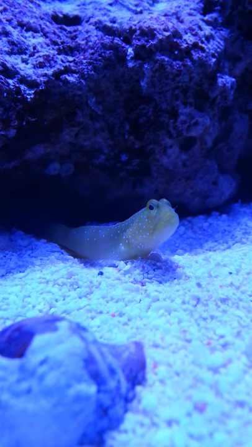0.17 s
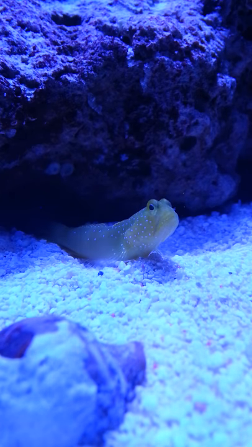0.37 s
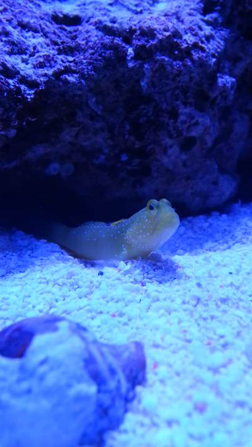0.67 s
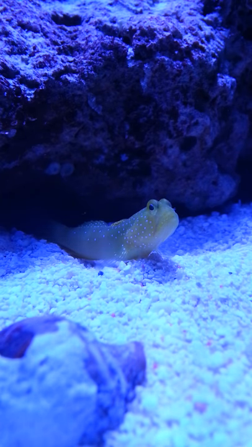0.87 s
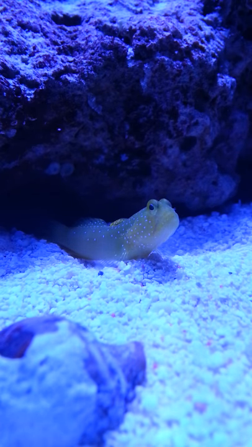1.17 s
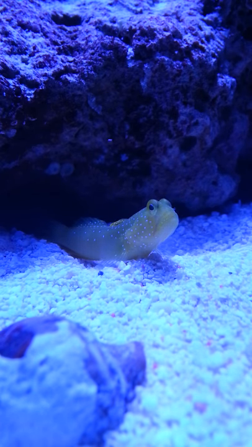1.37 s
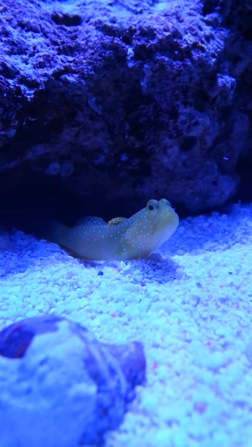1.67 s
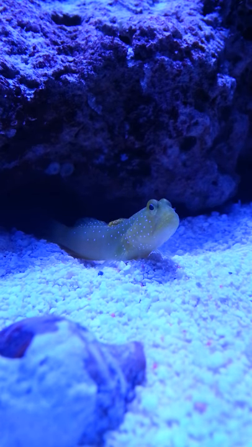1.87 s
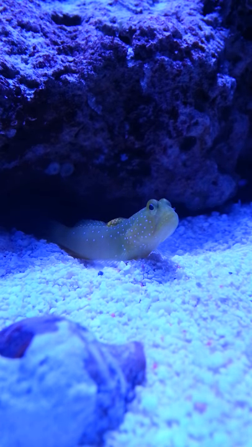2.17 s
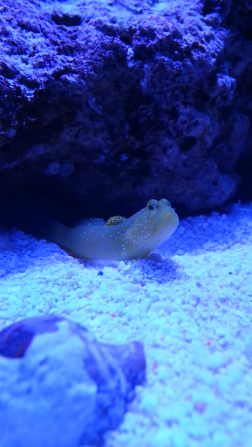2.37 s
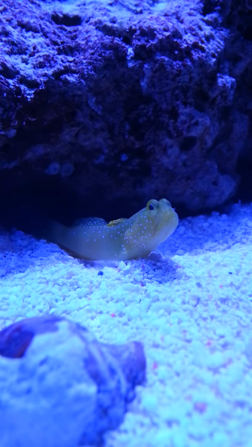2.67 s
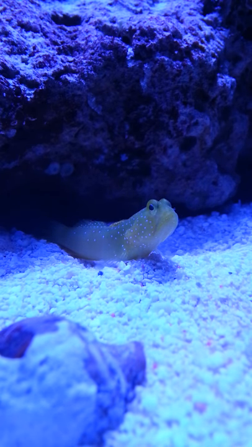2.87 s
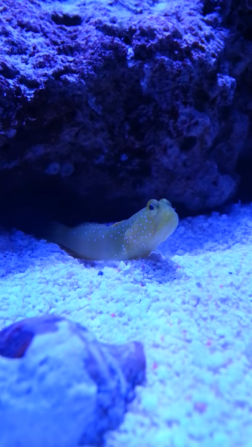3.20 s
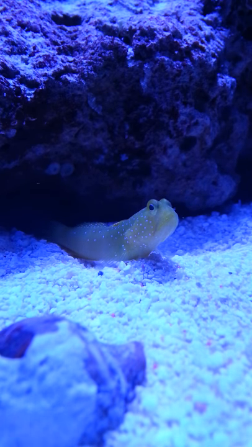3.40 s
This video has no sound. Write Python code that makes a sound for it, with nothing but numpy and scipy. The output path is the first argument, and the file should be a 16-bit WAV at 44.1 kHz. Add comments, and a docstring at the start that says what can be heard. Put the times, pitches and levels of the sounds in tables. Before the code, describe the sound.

Steady low hum of a fish tank pump, with water rumbling and lightly trickling.

```python
"""A home aquarium up close

The mains-powered pump hums through the tank and cabinet, water rumbles in the pipes, and the
drain murmurs and gulps air. The overflow trickles: a fizz of tiny bursting bubbles with louder
drips, all scattered by the room. A very faint electronic whine sits on the right."""
import sys
import numpy as np
from scipy import signal
from scipy.fft import rfft, irfft, next_fast_len
from scipy.io import wavfile
from scipy.ndimage import uniform_filter1d, map_coordinates

SR = 44100
rng = np.random.default_rng(int(sys.argv[2]) if len(sys.argv) > 2 else 0)


def bounce(signal):
    """Save signal as a 16-bit WAV file at the path given by the first command-line argument."""
    frames = np.transpose(np.atleast_2d(signal))
    limited = np.clip(frames, -1, 1)
    pcm = np.round(limited * 32767).astype(np.int16)
    wavfile.write(sys.argv[1], SR, pcm)


N = 156114

# tones of the pump's hum
# (multiple of the mains [x], level [dB], left minus right [dB], left lead [rad], waver [dB])
HUM_TONES = [(2, -38.5, 3.5, 0.15, 0.5), (3, -46, 0.5, 0.19, 1.53), (4, -52, -0.5, 0.99, 1.8),
             (5, -62.5, 2, .61, 3), (6, -60.5, 7.5, 0.023, 3.5), (7, -64.5, -3, 0.83, 2.5),
             (10, -76, -11, 0.1, 4.5), (15, -76.5, -5, 0.1, 3.5)]
# notes of the tank and cabinet (pitch [Hz], half-width [Hz], level [dB], left minus right [dB])
CABINET_NOTES = [(158.5, 9.9, -58.5, -3), (356.8, 11, -59, 3), (461, 12, -69.5, 13.5), (524.4, 6, -59, 2),
                 (1037, 6.4, -74.5, 14), (1268, 8.3, -74.5, 11)]
# tone colour of the rumble (frequency [Hz], left [dB per Hz], right [dB per Hz]), before RUMBLE_DB
RUMBLE_COLOUR = [(25, -103, -99), (45, -89, -89), (70.4, -79, -85), (94, -81.5, -80), (120, -73.5, -71),
                 (161, -63.5, -68.5), (188, -68.5, -76.5), (260, -80.5, -84.5), (346, -75, -73.5),
                 (480, -82.5, -87.5), (550, -74, -80.5), (680, -77.5, -72.5), (793, -72, -79.5),
                 (840, -77.5, -81.5), (877, -83.5, -84), (1220, -86, -90), (1410, -77.5, -81.5),
                 (1475, -95, -90), (1850, -82, -87.5)]
# how alike the rumble is in the two ears (frequency [Hz], likeness [0 to 1])
RUMBLE_LIKENESS = [(30, .4), (100, 1), (190, 0.89), (260, 1), (350, 0.15), (600, 0.25), (780, 1),
                   (1000, 0.25), (1400, 0.63), (1900, 0.079)]
# how far the pipes' sound waves run ahead in the left ear (frequency [Hz], left lead [rad])
PIPE_LEFT_LEAD = [(60, 0.4), (180, 1.13), (260, 0.66), (420, 1.9), (540, -.5), (780, -2), (920, -2.5),
                  (1500, -3)]
# notes the drain pipe rings at (pitch [Hz], relative level [dB], left minus right [dB])
DRAIN_NOTES = [(639.4, -5, 5), (688, -5, 3), (744.6, -3.5, 0.5), (782.6, -8, 3.5), (842.6, -6, 4.5),
               (873, -4.5, 0.5)]
# gulps of air in the drain (time [s], level before each note's own is added [dB])
AIR_GULPS = [(0.085, -41), (0.275, -42), (0.723, -41), (0.852, -36.5), (1.168, -38.5), (1.874, -41),
             (1.94, -46), (2.36, -39), (2.632, -38), (2.878, -39.5), (2.965, -38), (3.262, -39),
             (3.418, -43), (3.49, -36.5)]
# tone colour of the trickle (frequency [Hz], left [dB per Hz], right [dB per Hz]), before its gains
TRICKLE_COLOUR = [(1870, -83, -91.5), (2380, -90, -90), (3520, -87.5, -91), (3760, -85.5, -91),
                  (4660, -85, -90.5), (5190, -79.5, -90), (6300, -84, -87), (6900, -83, -85),
                  (7600, -93, -82.5), (8970, -94.5, -91), (10540, -95, -94.5), (12700, -101, -100),
                  (14800, -107, -106)]
# swells of the trickle; only the swing around the average counts (time [s], level [dB])
TRICKLE_SWELLS = [(0.0, -46), (0.06, -46.5), (0.14, -51), (0.2, -48), (0.31, -51), (0.51, -45), (0.58, -47),
                  (0.675, -49.5), (0.71, -47.5), (0.82, -46), (0.95, -50), (1.02, -47.5), (1.14, -49.5),
                  (1.27, -51.5), (1.4, -49.5), (1.52, -50.5), (1.68, -48.5), (1.77, -49.5), (1.98, -46.5),
                  (2.06, -50.5), (2.14, -46.5), (2.39, -47.5), (2.55, -49.5), (2.7, -49), (2.77, -50.5),
                  (3.02, -50), (3.06, -48), (3.24, -48), (3.54, -50)]
# how much of that swing each frequency follows (frequency [Hz], share [0 to 1])
SWELL_SHARE = [(1500, 0.85), (3000, 0.82), (5500, 0.85), (9000, 0.95), (14000, 0.31)]
# louder drips (time [s], level [dB], pitch [Hz], half-width [octaves], left minus right [dB])
LOUD_DRIPS = [(0.037, -32, 4770, 0.6, -3), (0.068, -35, 5970, 0.1, 13.5), (0.183, -40, 5800, .25, 5),
              (0.236, -39, 4700, .4, 3), (0.437, -34.5, 5130, 0.19, 7), (0.471, -38, 6100, 0.13, 14),
              (0.688, -34, 7200, 0.027, -10), (0.703, -33.5, 7000, 0.034, -3),
              (0.747, -38, 5000, 0.088, 10), (0.772, -34, 5830, 0.28, 5), (0.818, -33.5, 5430, 0.15, 5),
              (0.886, -37, 7500, 0.35, -3), (1.030, -37, 5170, 0.34, 11), (1.178, -31.5, 5500, 0.18, 9),
              (1.351, -36, 6550, .05, 6), (1.354, -36, 5540, .05, 10), (1.478, -36.5, 4700, .4, 2),
              (1.54, -37, 5370, 0.3, 9), (1.882, -42, 5400, 0.42, 3), (1.961, -37, 6500, 0.24, -1),
              (2.187, -37.5, 5340, .3, 10), (2.254, -35, 5250, 0.13, 10), (2.364, -28.5, 5300, 0.17, 10.5),
              (2.373, -36, 6940, 0.12, -8), (2.465, -40, 5300, 0.27, 6), (2.636, -37.5, 5400, 0.25, 11),
              (2.898, -40.5, 1950, 0.26, 5), (2.946, -38, 5200, .55, 5), (3.035, -33, 5000, 0.3, 6),
              (3.106, -36, 4600, 0.25, 8), (3.130, -43, 5350, .3, 3), (3.275, -42, 3460, .07, -11),
              (3.302, -35.5, 4650, .3, 10), (3.386, -32, 5070, 0.33, 3)]

MAINS_HZ = 60
RUMBLE_DB, SURGE_DB, SURGE_HZ = -0.55, 1.05, 398  # the rumble surges mostly above SURGE_HZ
CROSSOVER_HZ, TOP_HZ = 1805, 14600  # where rumble gives way to fizz; where the treble ends
PIPE_T60_S, ROOM_T60_S = 0.14, 0.15  # a T60 is the time a sound takes to fade by 60 dB
MURMUR_DB, GULP_ATTACK_S, GULP_DETUNE = -56, 0.008, 0.012
POPS_PER_S, POPS_DB, POP_SPREAD_DB = 420, -4, 3.5
POP_CYCLES, POP_DIRECT_GAIN = 7.5, 0.33  # a pop fades by 60 dB in POP_CYCLES vibrations
FIZZ_DB, FLICKER_DB = -2.5, 0.5
WHINE_HZ, WHINE_DB = 14000, -74
DRIP_ATTACK_S, DRIP_T60_S, DRIP_TAIL_DB = 0.0015, 0.02, -16
TICK_DB, TICK_HZ, TICK_OCTAVES, TICK_T60_S = -14.5, 4200, 0.45, 0.017


def amp(db):
    """Turn decibels into a gain to multiply by."""
    return 10 ** (np.asarray(db) / 20)


def unit(x):
    """Scale x to an average (rms) level of 1."""
    return x / np.sqrt(np.mean(x ** 2) + 1e-20)


def pan(db):
    """Left and right gains that make the left louder by db."""
    return amp([[db / 2], [-db / 2]])


def phase_pair(lead):
    """Left and right phase shifts that put the left ahead by lead radians."""
    return lead * np.array([[0.5], [-0.5]])


def look_up(table, hz, column=1):
    """Read between a table's rows, on a log frequency scale."""
    columns = np.transpose(table)
    return np.interp(np.log(hz + 1), np.log(columns[0] + 1), columns[column])


def ear_gains(table, hz):
    """Left and right gains that give white noise the table's tone colour."""
    return amp([look_up(table, hz, column=1), look_up(table, hz, column=2)]) * np.sqrt(SR / 2)


def wobble(per_s):
    """A smooth curve through per_s random values a second."""
    return map_coordinates(rng.standard_normal(int(N * per_s / SR) + 4), [np.arange(N) * per_s / SR])


def filtered(x, response):
    """Multiply each frequency in x by response(hz)."""
    size = x.shape[-1]
    padded = next_fast_len(size + SR // 10)
    return irfft(rfft(x, padded) * response(np.fft.rfftfreq(padded, 1 / SR)), padded)[..., :size]


def low_share(hz):
    """Share of the power kept for the rumble: near 1 in the bass, near 0 in the treble."""
    return 1 / (1 + (hz / CROSSOVER_HZ) ** 8)


def pump_hum():
    """The pump hums at multiples of the mains frequency, each wavering a little with the load."""
    t, out = np.arange(N) / SR, np.zeros((2, N))
    for multiple, db, side_db, lead, waver_db in HUM_TONES:
        phase = 2 * np.pi * (multiple * MAINS_HZ * t + rng.random()) + 0.017 * wobble(per_s=5.2)
        gain = np.sqrt(2) * amp(db + waver_db * wobble(per_s=6.88))
        out += gain * pan(side_db) * np.sin(phase + phase_pair(lead))
    return out


def cabinet_ring():
    """Swirling water keeps the tank and cabinet ringing at a few notes."""
    out = np.zeros((2, N))
    for hz, width, db, side_db in CABINET_NOTES:
        swirl = rng.standard_normal(N) + 0.33 * rng.standard_normal((2, N))  # mostly alike in both ears
        note = filtered(swirl, lambda f: 1 / (1 + ((f - hz) / width) ** 2))
        out += amp(db) * pan(side_db) * unit(note)
    return out


def water_rumble():
    """Water rumbles in the pipes and surges at random."""
    def stereo_spread(hz):
        angle = np.arccos(np.clip(look_up(RUMBLE_LIKENESS, hz), -1, 1)) / 2
        return np.array([np.cos(angle), np.sin(angle)])

    def colour(hz):
        phase_shift = np.exp(1j * phase_pair(look_up(PIPE_LEFT_LEAD, hz)))
        return ear_gains(RUMBLE_COLOUR, hz) * np.sqrt(low_share(hz)) * phase_shift

    mid, side = filtered(rng.standard_normal((2, N)), stereo_spread)
    noise = np.array([mid + side, mid - side])
    swing = amp(SURGE_DB * wobble(per_s=16)) - 1
    surge = filtered(noise * swing, lambda hz: hz ** 2 / (hz ** 2 + SURGE_HZ ** 2))
    return amp(RUMBLE_DB) * filtered(noise + surge, colour)


def drain():
    """Small air bubbles keep the drain pipe murmuring; each bigger gulp rings the same notes."""
    t, out = np.arange(SR // 4) / SR, np.zeros((2, N + SR))
    envelope = (1 - np.exp(-t / GULP_ATTACK_S)) * amp(-60 * t / PIPE_T60_S)
    for hz, note_db, side_db in DRAIN_NOTES:
        phase = 2 * np.pi * hz * t + phase_pair(look_up(PIPE_LEFT_LEAD, hz))
        gain = amp(note_db) * pan(side_db)
        bubbles = rng.standard_normal(N + len(t) - 1) + 0.66 * rng.standard_normal((2, N + len(t) - 1))
        murmur = signal.fftconvolve(bubbles, envelope * np.sin(phase), "valid", axes=1)
        out[:, :N] += amp(MURMUR_DB) * gain * unit(murmur)
        for start_s, db in AIR_GULPS:
            extra_cycles = rng.random() + GULP_DETUNE * rng.standard_normal() * hz * t
            note = np.sin(phase + 2 * np.pi * extra_cycles)
            out[:, round(start_s * SR):][:, :len(t)] += amp(db) * gain * envelope * note
    return out[:, :N]


def fizz(patch_db):
    """A separate hiss for each ear, with random louder and softer patches in time and pitch."""
    spectrum = signal.stft(rng.standard_normal((2, N)), nperseg=512)[2]
    patches = rng.standard_normal(spectrum.shape[1:])
    for axis in (0, 1):
        patches = uniform_filter1d(patches, size=8, axis=axis)
    hiss = signal.istft(spectrum * amp(patch_db * unit(patches)), nperseg=512)[1]
    return unit(hiss[:, :N])


def bubble_pops(spots=12, size=400):
    """Tiny bubbles burst at several spots on the surface; each spot has its own room echo."""
    t, echo_t = np.arange(size) / SR, np.arange(SR // 5) / SR
    out = np.zeros((2, N))
    for _ in range(spots):
        echo = rng.standard_normal((2, len(echo_t))) * amp(-60 * echo_t / ROOM_T60_S)
        echo /= np.linalg.norm(echo[0])
        echo[[0, 1], rng.integers(0, 20, 2)] += POP_DIRECT_GAIN  # the straight path to each ear
        when, pitch, strength = rng.random((int(POPS_PER_S * N / SR / spots), 3)).T[:, :, None]
        hz = 1300 + 11500 * pitch
        pop_db = POP_SPREAD_DB * np.minimum(-np.log(1 - strength), 3)  # many soft, a few loud
        pops = amp(pop_db - 60 * t * hz / POP_CYCLES) * np.sin(2 * np.pi * hz * t) * np.sqrt(hz)
        positions = (when * N).astype(int) + np.arange(size)
        crackle = np.bincount(positions.ravel(), pops.ravel())  # add each pop in at its own time
        out += signal.fftconvolve(np.pad(crackle, (0, N))[None, :N], echo, axes=1)[:, :N]
    return unit(out) * np.sqrt(2 * TOP_HZ / SR)


def trickle():
    """Fizz and pops swell with the overflow and flicker quickly at random."""
    times, levels_db = np.transpose(TRICKLE_SWELLS)
    level_db = np.interp(np.arange(N) / SR, times, levels_db)
    swing_db = level_db - level_db.mean() + FLICKER_DB * wobble(per_s=40.2)
    water = amp(FIZZ_DB) * fizz(patch_db=0.8) + amp(POPS_DB) * bubble_pops()
    swell = filtered(water * (amp(swing_db) - 1), lambda hz: look_up(SWELL_SHARE, hz))
    return filtered(water + swell, lambda hz: ear_gains(TRICKLE_COLOUR, hz) * np.sqrt(1 - low_share(hz)))


def whine():
    """The tank's electronics give off a thin, steady tone on the right."""
    tone = np.sqrt(2) * np.sin(2 * np.pi * WHINE_HZ * np.arange(N) / SR)
    return amp(WHINE_DB) * tone * amp([[-22], [3]])


def scattered_note(hz, octaves, size):
    """Stereo noise around one pitch: a wide band sounds splashy, a narrow one plinks."""
    noise = rng.standard_normal((2, size))
    return unit(filtered(noise, lambda f: 1 / (1 + (np.log2((f + 1) / hz) / octaves) ** 2)))


def drips():
    """Each drip ticks as it breaks the surface, rings a bubble and leaves a short room echo."""
    t, out = np.arange(SR // 4) / SR, np.zeros((2, N + SR))
    bubble_fade = amp(-60 * t / DRIP_T60_S)
    room_fade = amp(DRIP_TAIL_DB - 60 * t / ROOM_T60_S)
    envelope = (1 - np.exp(-t / DRIP_ATTACK_S)) * np.hypot(bubble_fade, room_fade)
    for start_s, db, hz, octaves, side_db in LOUD_DRIPS:
        note = unit(envelope * scattered_note(hz, octaves, len(t))) * np.sqrt(np.mean(envelope ** 2))
        tick = amp(TICK_DB - 60 * t / TICK_T60_S) * scattered_note(TICK_HZ, TICK_OCTAVES, len(t))
        out[:, round(start_s * SR):][:, :len(t)] += amp(db) * (pan(side_db) * note + tick)
    return out[:, :N]


def scene():
    """All the aquarium's sounds together."""
    return pump_hum() + cabinet_ring() + water_rumble() + drain() + trickle() + whine() + drips()


def record(dry):
    """Cut away the treble above TOP_HZ."""
    return filtered(dry, lambda hz: hz < TOP_HZ)


dry = scene()
out = record(dry)
bounce(out)
```